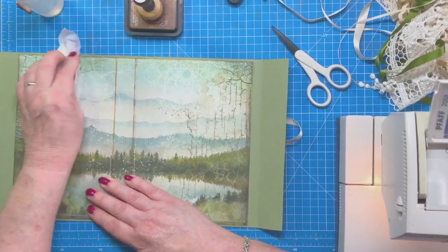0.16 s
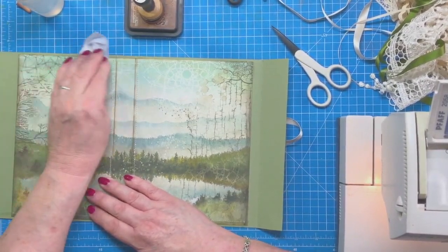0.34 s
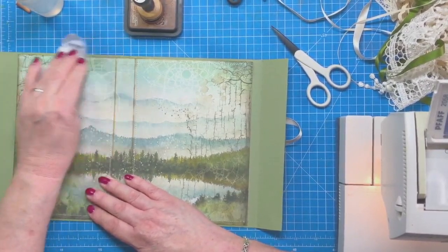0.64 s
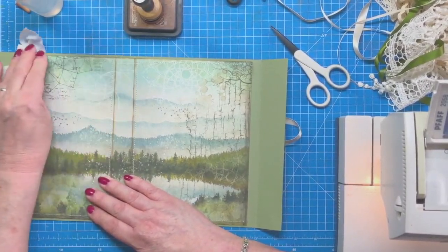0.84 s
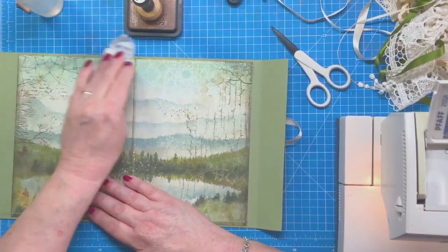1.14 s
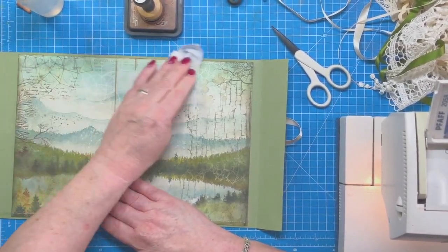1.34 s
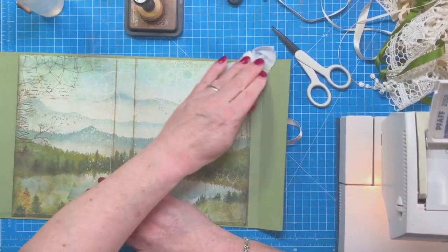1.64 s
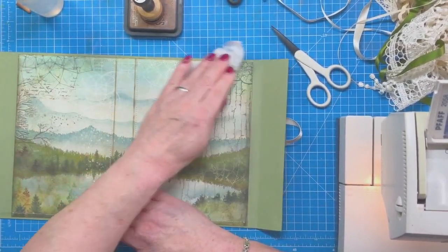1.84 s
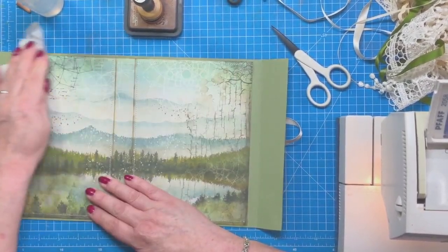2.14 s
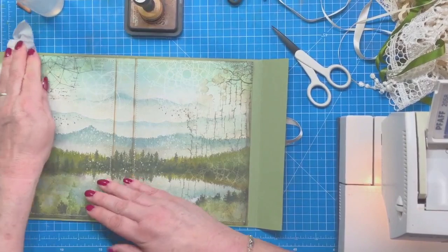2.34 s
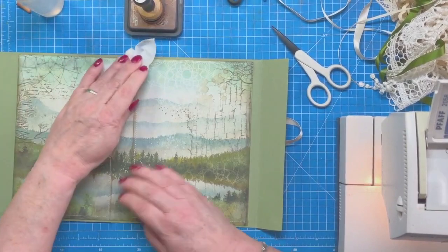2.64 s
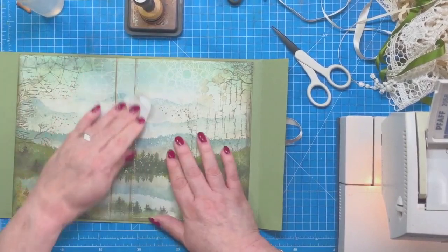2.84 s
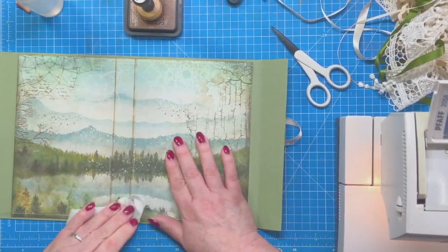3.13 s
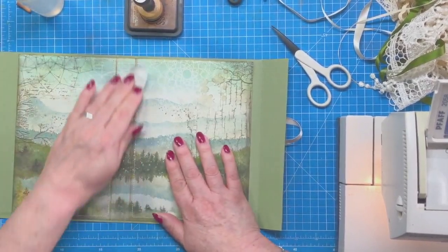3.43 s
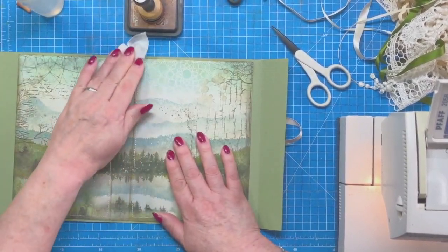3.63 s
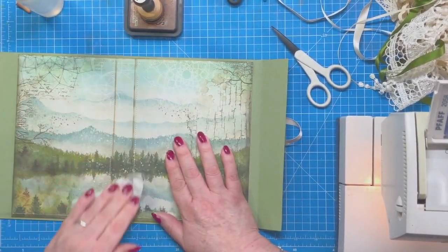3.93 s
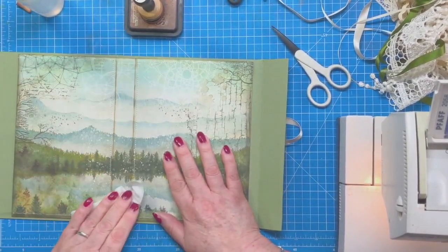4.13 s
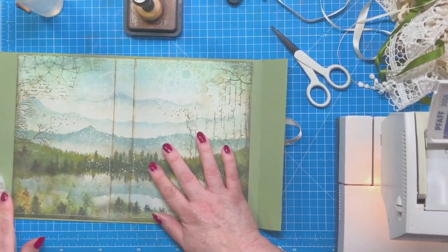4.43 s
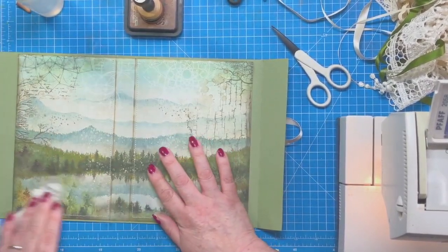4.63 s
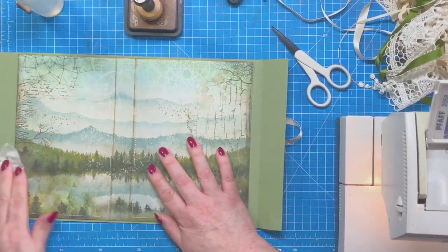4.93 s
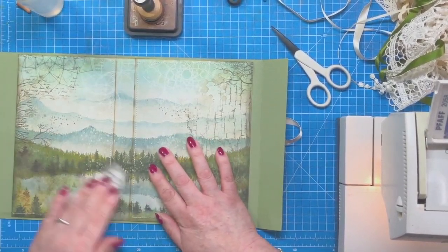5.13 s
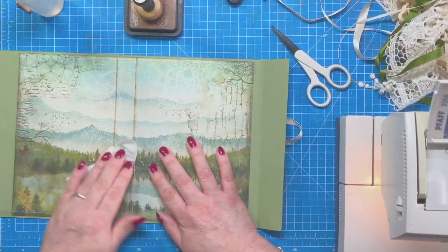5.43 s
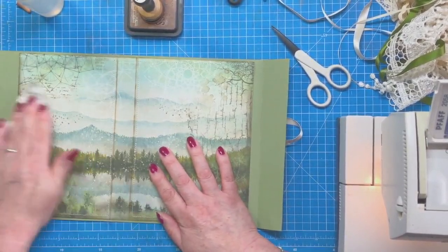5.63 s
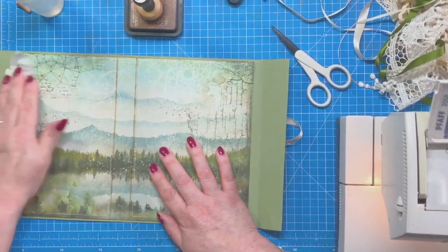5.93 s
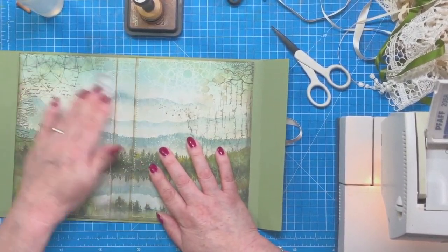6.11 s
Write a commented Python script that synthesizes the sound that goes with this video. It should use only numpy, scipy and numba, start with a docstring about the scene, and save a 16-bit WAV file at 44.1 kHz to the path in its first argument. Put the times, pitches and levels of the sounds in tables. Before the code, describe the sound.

Dry, breathy paper rubbing, long swishes turning to quick short scrubs, crisp little snaps, and a sudden hard rattle past the middle, indoors and close.

```python
"""On a craft table in a small quiet room, a wadded tissue is scrubbed to and fro over paper glued to a card cover.
The wad hisses through thousands of tiny random slips, shaped by moving resonances; coarser slips make the card
rasp and the table rumble. Paper edges snap as filtered pulses, the cover taps the mat with a pat and a short ring,
and once the hand knocks something that clatters, its many tones ringing at each blow.
A faint hum and room noise lie behind it all, and the room adds a quiet tail."""
import sys
import numpy as np
from scipy import signal
from scipy.fft import rfft, irfft, next_fast_len
from scipy.io import wavfile
from scipy.ndimage import uniform_filter1d
from numba import njit

SR = 44100
rng = np.random.default_rng(int(sys.argv[2]) if len(sys.argv) > 2 else 0)


def store_pcm(level_fs):
    """Save levels as 16-bit WAV."""
    pcm = np.round(np.clip(level_fs, -1, 1) * 32767).astype(np.int16)
    wavfile.write(sys.argv[1], SR, np.atleast_2d(pcm).T)


N = 276507
T = np.arange(N) / SR  # time of every sample, s
TOP_HZ = 15900  # upper limit of the sound


def undb(db):
    """Turn decibels into a gain."""
    return 10 ** (np.asarray(db) / 20)


def unit(x):
    """Scale a sound to an average (rms) level of 1."""
    return x / np.sqrt(np.mean(x ** 2))


def colour(x, points):
    """Give a sound the spectrum drawn by (pitch_hz, level_db) points, without smearing it back in time."""
    hz, db = np.transpose(points)
    size = 2 * next_fast_len(len(x))
    f = np.maximum(np.fft.rfftfreq(size, 1 / SR), 1)
    skirts = np.minimum(f / hz[0], 1) ** 2 * np.minimum(hz[-1] / f, 1) ** 2  # fall off outside the points
    gain = undb(np.interp(np.log(f), np.log(hz), db)) * skirts
    # folding the cepstrum makes the filter minimum-phase: it answers only after its input
    cepstrum = irfft(np.log(gain))
    cepstrum[1:size // 2] *= 2
    cepstrum[size // 2 + 1:] = 0
    response = np.exp(rfft(cepstrum))
    return irfft(rfft(x, size) * response)[:len(x)]


def walk(rate):
    """Wander smoothly at random with spread 1, changing about rate times a second."""
    k = max(int(SR / rate), 1)
    steps = np.repeat(rng.standard_normal(N // k + 1), k)
    return unit(uniform_filter1d(steps, k)[:N])


def fade(t, t60):
    """Die away exponentially, 60 dB down after t60 seconds."""
    return np.exp(-np.log(1000) * t / t60)


def soften(x, hz):
    """Dull the treble above hz, as a softer, longer contact does."""
    return signal.sosfilt(signal.butter(2, hz, fs=SR, output="sos"), x)


def thin(x, hz):
    """Cut the bass below hz, because a small body radiates little of it."""
    return signal.sosfilt(signal.butter(4, hz, "highpass", fs=SR, output="sos"), x)


def add(out, s, x):
    """Mix x into out from time s."""
    i = int(s * SR)
    out[i:i + len(x)] += x[:N - i]


def blow(x, db):
    """Give a blow as much energy as a steady level of db held for 5 ms."""
    return x * undb(db) * np.sqrt(.005 * SR / np.sum(x ** 2))


def slips(rate, spread_db):
    """Make tiny stick-slip clicks at random moments, rate a second, with sizes that vary by spread_db."""
    happens = rng.random(N) < rate / SR
    size = undb(spread_db * np.clip(rng.standard_normal(N), -2.5, 2.5))
    clicks = happens * rng.choice([-1, 1], N) * size
    return unit(clicks / np.sqrt(rate))  # a higher rate is denser, not louder


@njit
def resonate(x, hz, width):
    """Band-pass whose centre and width (Hz) move from sample to sample; gain 1 at the centre."""
    y, band, low = np.empty(len(x)), 0., 0.
    for i in range(len(x)):
        g, k = np.tan(np.pi * hz[i] / SR), width[i] / hz[i]
        v = (band + g * (x[i] - low)) / (1 + g * (g + k))
        band, low, y[i] = 2 * v - band, low + 2 * g * v, k * v
    return y


def formant(x, hz, q):
    """Ring a sound through one moving resonance twice, for steep sides, at rms 1."""
    once = resonate(x, hz, hz / q)
    return unit(resonate(once, hz, hz / q))


# spectrum of the room noise: pitch_hz, level_db (relative)
ROOM_SPECTRUM = [(18, -44), (30, -26.5), (230, -2.5), (505, -7.5), (639, -3), (767, -9), (1400, -5),
                 (1870, -11.5), (2240, -10), (4310, -12.5), (5170, -10.5), (7460, -12), (15500, -16.5)]
ROOM_DB = -60
HUM_HZ, HUM_DB = 122, -78


def quiet_room():
    """Still room noise is shaped random noise, with a faint steady hum."""
    air = unit(colour(rng.standard_normal(N), ROOM_SPECTRUM))
    hum = unit(np.sin(2 * np.pi * HUM_HZ * T))
    return undb(ROOM_DB) * air + undb(HUM_DB) * hum


def walls(x, wet_db, low_t60, high_t60):
    """A small furnished room returns a faint, diffuse tail whose lows stay longest."""
    t = T[:SR // 2]
    low, high = rng.standard_normal((2, len(t)))
    tail = 1.44 * soften(low, 620) * fade(t, low_t60) + soften(high, 8000) * fade(t, high_t60)
    tail *= t > .006  # the first reflections take 6 ms to arrive
    tail /= np.sqrt(np.sum(tail ** 2))
    return undb(wet_db) * signal.fftconvolve(x, tail)[:N]


# blows of the knock and its clatter: start_s, level_db (before the bass cut), treble_limit_hz of the contact
KNOCK_BLOWS = [(4.3564, -27, 6000), (4.3638, -20.5, 5530), (4.3705, -22, 2820), (4.3745, -25, 3000),
               (4.3785, -29, 1400), (4.4334, -32.5, 2800), (4.4381, -26.5, 980), (4.448, -37, 2380),
               (4.4525, -28, 1500), (4.459, -31, 1000), (4.465, -28, 1080), (4.494, -33, 2000),
               (4.499, -37, 600), (4.522, -38, 1110)]
# tones of the knocked thing: pitch_hz, level_db (relative, average), die_away_s (to 60 dB down)
KNOCK_TONES = [(197, -13, .25), (238.6, -11.5, 0.17), (290, -15, 0.15), (497, -1.5, 0.098), (666, 0, 0.055),
               (743, -0.5, 0.069), (960, -2.5, 0.095), (1046, -2, 0.11), (1134, -9, 0.19),
               (1127, -4, 0.068), (1227, -5, 0.13), (1325, -3, 0.094), (1500, -2.5, 0.049),
               (1700, -12, 0.054), (1810, -13, 0.046), (1880, -6, 0.049), (1986, -17, 0.054),
               (2056, -1, 0.061), (2210, 1, 0.056), (2500, -3.5, 0.056), (2650, -4, 0.037), (3563, 5, .035),
               (3610, -2, 0.028)]
# spectrum of its crack and dense tail: pitch_hz, level_db (relative)
KNOCK_SPECTRUM = [(90, -34), (145, -14), (190, -6.5), (270, 0), (380, -18), (500, 0), (600, -9), (730, 0),
                  (1300, -8), (2000, 1), (3000, -7.5), (3550, -1), (4300, -8), (12000, -17.5)]


def knock():
    """Every blow of the clatter cracks, rings the same tones in new shares and leaves a dense tail."""
    out, t = np.zeros(N), T[:SR // 2]
    hz, tone_db, t60 = np.transpose(KNOCK_TONES)[:, :, None]
    for s, db, contact_hz in KNOCK_BLOWS:
        shares = undb(tone_db + 1.7 * rng.standard_normal(hz.shape)) * rng.choice([-1, 1], hz.shape)
        pitch = hz * (1 + 0.0074 * rng.standard_normal(hz.shape))  # it sits a little differently at each blow
        ring = np.sum(shares * np.cos(2 * np.pi * pitch * t) * fade(t, t60), axis=0)
        crack = colour(1. * (t == 0), KNOCK_SPECTRUM)
        tail = colour(rng.standard_normal(len(t)) * fade(t, .09), KNOCK_SPECTRUM)
        hit = unit(ring) + undb(-1) * unit(crack) + undb(-4) * unit(tail)
        add(out, s, blow(soften(hit, contact_hz), db))
    return thin(out, 115)


# cover and fingers tapping the mat: start_s, level_db (before the bass cut), treble_limit_hz of the pat, ring_hz
MAT_TAPS = [(.3675, -41.5, 2300, 603), (0.668, -44, 2000, 1000), (.797, -43.5, 500, 549),
            (.99, -45, 350, 240), (2.293, -48, 2200, 1210), (2.5892, -34.5, 4000, 1470),
            (2.596, -39.5, 2200, 655), (2.603, -42, 1200, 392), (3.65, -51, 700, 636),
            (4.577, -41.5, 400, 290), (4.615, -47.5, 350, 270), (6.218, -47, 1310, 1130)]
# spectrum of the pat: pitch_hz, level_db (relative)
PAT_SPECTRUM = [(120, -32.5), (250, 2), (380, 2.5), (560, 0), (850, 5), (1400, 0.5), (2500, 1), (6000, -14)]


def taps():
    """The cover or a finger lands on the mat with a short pat and a brief ring, each spot at its own pitch."""
    out, t = np.zeros(N), T[:SR // 5]
    for s, db, contact_hz, ring_hz in MAT_TAPS:
        strike = (t == 0) + 0.12 * rng.standard_normal(len(t)) * fade(t, 0.092)
        pat = soften(colour(strike, PAT_SPECTRUM), contact_hz)
        ring = np.sin(2 * np.pi * ring_hz * t) * fade(t, 50 / ring_hz)  # low rings last longer
        add(out, s, blow(unit(pat) + undb(-1.5) * unit(ring), db))
    return thin(out, 150)


# paper edges and creases snapping under the wad: start_s, level_db, pitch_hz
PAPER_SNAPS = [(.7622, -45, 6500), (.778, -48, 11000), (0.8445, -37.5, 4860), (0.932, -42, 13000),
               (2.202, -41.5, 2100), (2.401, -40, 7500), (4.0815, -48, 4470), (4.785, -41.5, 4500),
               (4.926, -43, 2300), (4.9522, -38.5, 3470), (5.2565, -41, 6500), (5.2788, -35.5, 4050),
               (5.3055, -36.5, 4000), (5.484, -33.5, 4380), (5.493, -39, 3800), (5.6016, -35.5, 6000),
               (5.811, -38, 3200), (5.9438, -33.5, 5900), (5.954, -37.5, 3980), (6.1474, -40, 3460)]


def snaps():
    """A paper edge flicks free: a sharp pulse in a broad resonance, then a few ms of flutter."""
    out, t = np.zeros(N), T[:SR // 20]
    for s, db, hz in PAPER_SNAPS:
        flick = (t == 0) + 0.2 * rng.standard_normal(len(t)) * fade(t, 0.018)
        band = signal.butter(2, [hz / 2.1, min(hz * 1.9, TOP_HZ)], "bandpass", fs=SR, output="sos")
        add(out, s, blow(signal.sosfilt(band, flick), db))
    return out


# short thumps and scuffs of the wad, over a fold or as a sweep starts:
# peak_s, half_length_s, rumble_db, scuff_db (both before mixing)
THUMPS_AND_SCUFFS = [(.005, .03, -53, -60), (1.248, 0.018, -61, -50), (1.935, .04, -53, -53),
                     (2.067, 0.03, -57, -70), (2.3, .022, -71, -48), (3.261, 0.015, -56, -62),
                     (3.38, 0.057, -58, -65), (3.784, 0.02, -59, -62), (4.815, .018, -75, -49.5),
                     (4.898, 0.011, -66, -47), (5.227, .01, -61, -49), (5.47, .016, -58, -53),
                     (5.555, 0.0069, -59, -45.5), (5.726, 0.012, -55, -46), (5.812, 0.017, -64, -43.5),
                     (6.141, 0.019, -63, -48.5), (6.217, 0.01, -52, -45)]


def thumps_and_scuffs():
    """Each thump or scuff gives a short bell-shaped swell; returns the gains of its rumble and its scuff."""
    gains = np.zeros((2, N))
    for s, half_s, rumble_db, scuff_db in THUMPS_AND_SCUFFS:
        swell = np.exp(-.5 * ((T - s) / half_s) ** 2)
        gains += undb([[rumble_db], [scuff_db]]) * swell
    return gains


# sweeps of the wad: start_s, end_s, speeding_up_s, slowing_down_s, level_db (before mixing), swell_db (start to end),
# fine_hiss_db and rasp_db (relative to level_db), rumble_db (before mixing), fold_pitch_hz (the fold that bears)
SWEEPS = [(-0.056, 0.15, 0.05, 0.095, -47.5, -2, -0.5, -4.5, -67, 2700.0),
          (0.161, 0.402, 0.058, 0.107, -46.0, -1.5, -2, -6.5, -65.5, 6450),
          (0.35, 0.455, 0.029, 0.015, -54.5, -7, -1, -11, -75, 2500.0),
          (0.391, 0.707, 0.12, 0.08, -44.0, -0.5, -1.5, -7, -62.0, 2980),
          (0.711, 0.809, 0.051, 0.04, -50, -2.5, -5, -5.0, -65, 2500.0),
          (0.772, 0.91, 0.028, 0.051, -59, 4, 1.5, 2.5, -60, 4230),
          (0.863, 1.21, 0.066, 0.073, -45.5, -1.5, -3, -5, -63.5, 2440),
          (1.113, 1.626, 0.12, 0.087, -45, -4, -6, -7, -64.5, 2500.0),
          (1.618, 2.145, 0.14, 0.063, -43.5, -1.5, -2.5, -8.5, -67, 6700.0),
          (2.215, 2.54, 0.156, 0.11, -42.0, -15, -2.0, -9.0, -65, 4100.0),
          (2.476, 2.61, 0.039, 0.023, -49, 4, -4, -6.5, -64.5, 4000.0),
          (2.567, 3.038, 0.043, 0.1, -44.0, -3, -2, -6.5, -63.5, 6200),
          (3.074, 3.542, 0.064, 0.16, -45.0, 1.5, -2.0, -8.5, -63.5, 7440),
          (3.568, 3.964, 0.068, 0.085, -46.0, -3.5, -2, -8, -64, 4630),
          (3.979, 4.081, 0.032, 0.038, -54.0, -1.5, -9, -7.0, -68, 5200.0),
          (4.069, 4.369, 0.076, 0.061, -43.5, 8, -4.5, -11, -67.5, 3570),
          (4.345, 4.52, 0.02, 0.034, -53, -14, -13, 0, -60, 4200),
          (4.44, 4.7, 0.12, 0.052, -42.5, -9, -6, -6.5, -60, 5300.0),
          (4.683, 4.876, 0.041, 0.068, -43, 1, -4.5, -10, -63.0, 3680),
          (4.851, 5.044, 0.057, 0.053, -43.5, -1.5, -3.5, -9.5, -70, 4900.0),
          (5.031, 5.246, 0.032, 0.15, -41.5, 9, -0.5, -8, -66, 5000.0),
          (5.19, 5.382, 0.036, 0.081, -42.5, 4, -2.5, -5.5, -62, 2500.0),
          (5.361, 5.549, 0.039, 0.058, -42.5, 0.5, -1.5, -7, -64.5, 3700.0),
          (5.532, 5.702, 0.03, 0.053, -42.5, 3.5, -2.5, -9.0, -62.5, 6000.0),
          (5.666, 5.867, 0.066, 0.056, -44, -3, -0.5, -9.5, -60, 3500.0),
          (5.843, 6.033, 0.035, 0.059, -44.5, -1, -2.5, -7.5, -61.5, 3600.0),
          (6.024, 6.2, 0.031, 0.072, -42.5, 1, -2.5, -14, -60.5, 3430),
          (6.177, 6.315, 0.05, 0.043, -44.5, -5, -3, -12.5, -63.0, 2500.0)]
ARCH = .15  # share by which the hand is slower at the ends of a sweep than in its middle, besides starting and stopping
FINE_POWER, RASP_POWER, RUMBLE_POWER = 1.62, 0.65, 0.44  # each layer grows as speed to this power
SHOVE_DB, SHOVE_RASP_DB, SHOVE_S = 5.5, 2.5, .045  # the first shove adds rumble and rasp, then dies away
STICK_DB, BREAKAWAY = 3, 0.39  # the wad clings, this much quieter, up to this share of its speeding-up
SHAKE_DB, SHAKE_S = -70.5, 0.19  # table shake at full speed; sweeps longer than SHAKE_S shake it less


def sweeps():
    """The hand speeds up, glides and slows; returns speed, gains of five layers, and the bearing fold's pitch."""
    power, fold = np.zeros((6, N)), np.full(N, float(SWEEPS[0][-1]))
    for start, end, rise_s, fall_s, db, swell_db, fine_db, rasp_db, rumble_db, fold_hz in SWEEPS:
        on = (T > start) & (T < end)
        t, length = T[on] - start, end - start
        along = t / length - .5  # -0.5 at the start, 0.5 at the end
        rise = np.sin(np.pi / 2 * np.minimum(t / rise_s, 1))
        fall = np.sin(np.pi / 2 * np.minimum((length - t) / fall_s, 1))
        speed = (rise * fall) ** 2 * (1 - ARCH * (2 * along) ** 2)
        stuck = .5 - .5 * np.tanh((t - BREAKAWAY * rise_s) / .003)  # 1 while clinging, then 0
        shove = np.exp(-t / SHOVE_S)
        press = undb(db + swell_db * along - STICK_DB * stuck)
        fine = press * undb(fine_db) * speed ** FINE_POWER
        rasp = press * undb(rasp_db + SHOVE_RASP_DB * shove) * speed ** RASP_POWER
        rumble = undb(rumble_db + SHOVE_DB * shove) * speed ** RUMBLE_POWER
        shake = undb(SHAKE_DB) * speed * min(SHAKE_S / length, 1) ** 2
        # overlapping sweeps add as powers
        power[:, on] += np.array([speed, press * speed, fine, rasp, rumble, shake]) ** 2
        fold[T > start] = fold_hz
    return *np.sqrt(power), uniform_filter1d(fold, size=SR // 25)  # the fold's pitch glides over 40 ms


# spectrum of the rumble: pitch_hz, level_db (relative)
RUMBLE_SPECTRUM = [(50, -29), (90, -12.5), (140, -4), (200, 4.5), (290, -5), (390, 3.5), (480, -8.5),
                   (620, -2), (760, -11), (1100, -13)]
COVER_HZ, COVER_WANDER = 301, 0.17  # pitch of the loaded cover, and the share by which it wanders
SHAKE_HZ = 140  # pitch of the shaking table


def table(weight, shake):
    """The dragging hand judders the cover at a wandering pitch; short, brisk sweeps shake the table."""
    top = unit(colour(slips(900, spread_db=4.5), RUMBLE_SPECTRUM))
    cover = formant(slips(700, spread_db=4), COVER_HZ * np.exp(COVER_WANDER * walk(6)), q=2.2)
    board = formant(slips(90, spread_db=5), np.full(N, float(SHAKE_HZ)), q=1.24)
    judder = (undb(-5) * top + undb(-3) * cover) * undb(-0.3 + 2.1 * walk(30))
    return weight * judder + shake * board


# spectra of the fibre hiss, the fine hiss and the card rasp: pitch_hz, level_db (relative)
HISS_SPECTRUM = [(900, -26), (1600, -10), (2500, -4.5), (3500, 0), (5000, 1.5), (5700, 0.5), (6300, 0),
                 (7000, -2.5), (7800, -8.5), (10000, -8), (15000, -32)]
FINE_SPECTRUM = [(4000, -16), (6500, -2.5), (8500, 0), (10500, -2.5), (12500, -5.5), (14500, -12),
                 (16000, -18)]
RASP_SPECTRUM = [(350, -12), (600, -13), (750, -8.5), (950, -5.5), (1200, -2), (1850, -1.5), (2400, -2),
                 (3500, -6), (6000, -22.5)]
# hollow under the arched hand, ringing when it lies flat and near: time_s, pitch_hz, level_db
# (average pitch and level of its lower resonance, relative to the dense fibre hiss)
HAND_HOLLOW = [(0, 1600, -24), (1.0, 1880, -26), (1.27, 2220, -12.5), (1.6, 2530, -29), (2.3, 1290, -16),
               (2.5, 1650, -26), (3.0, 1790, -14), (3.11, 1880, -2), (3.2, 1850, -9.5), (4.7, 1700, -15.5),
               (4.83, 1660, -3.5), (5.04, 1600, -18), (5.19, 1620, -1), (5.28, 1660, -20), (5.56, 1520, -9),
               (5.66, 1550, -38), (5.81, 1590, -13), (6.26, 1600, -29)]
FOLD_DB, FOLD_Q = -10, 3.6  # the bearing fold: level relative to the dense hiss, sharpness
CRACKLE_PER_S, CRACKLE_DB = 110, -11  # single fibres tearing loose; level relative to the dense hiss


def fibre_hiss(speed, bearing_hz):
    """Fibres catch and slip more often at speed, while folds of the wad colour the hiss and single fibres tear."""
    hiss = unit(colour(slips(3000 + 19000 * speed, spread_db=4), HISS_SPECTRUM))
    # folds of the wad shift as it rolls, so patches of the hiss swell and slide
    for fold_hz in (2700, 3700, 6200):
        patch = formant(slips(9000, spread_db=3.5), fold_hz * np.exp(0.11 * walk(9)), q=3.8)
        hiss += patch * undb(-16 + 2.7 * walk(22))
    bearing_hz = bearing_hz * np.exp(0.072 * walk(12))
    hiss += undb(FOLD_DB) * formant(slips(9000, spread_db=2.5), bearing_hz, q=FOLD_Q)
    crackle = unit(colour(slips(CRACKLE_PER_S, spread_db=1), HISS_SPECTRUM))
    return hiss + undb(CRACKLE_DB) * crackle


def hand_hollow():
    """Coarse slips ring the air under the hand at two linked pitches, which shift as the fingers slide."""
    catches = slips(2000, spread_db=5.5)
    time_s, pitch_hz, level_db = np.transpose(HAND_HOLLOW)
    hz = np.interp(T, time_s, pitch_hz) * np.exp(0.041 * walk(25))
    ring = formant(catches, hz, q=5.0) + undb(-4.5) * formant(catches, 2.2 * hz, q=4.9)
    return ring * undb(np.interp(T, time_s, level_db) + 2 * walk(60))


def tissue(speed, hiss_gain, fine_gain, rasp_gain, bearing_hz):
    """A faster stroke frees more fibres and hisses more finely; a slow, heavy one makes the card rasp."""
    grip = undb(0.65 * walk(90) + 0.18 * walk(15))  # the wad grips and lets go unevenly
    hiss = undb(-1) * (fibre_hiss(speed, bearing_hz) + hand_hollow())
    fine = unit(colour(slips(4000 + 16000 * speed, spread_db=2.5), FINE_SPECTRUM))
    fine *= undb(0.5 + 1.2 * walk(16))
    # faster drag catches the paper's grain more often
    rasp = unit(colour(slips(900 + 1800 * speed, spread_db=2.5), RASP_SPECTRUM))
    rasp *= undb(-1.02 + 2 * walk(50))
    return grip * (hiss_gain * hiss + fine_gain * fine + rasp_gain * rasp)


SCUFF_HISS_DB = 2.5  # hiss gain of a scuff, relative to its rasp gain


def scene():
    """Mix everything on the table with the room, alike in both channels."""
    speed, hiss, fine, rasp, rumble, shake, fold_hz = sweeps()
    thump, scuff = thumps_and_scuffs()
    hiss = np.hypot(hiss, undb(SCUFF_HISS_DB) * scuff)
    rubbing = tissue(speed, hiss, fine, np.hypot(rasp, scuff), fold_hz)
    rumbling = table(np.hypot(rumble, thump), shake)
    near = knock() + taps() + snaps() + rumbling + rubbing
    mono = quiet_room() + walls(near, wet_db=-18.5, low_t60=0.3, high_t60=0.23) + near
    return np.array([mono, mono])


def record(dry):
    """The recorder steeply cuts the treble above TOP_HZ."""
    return signal.sosfilt(signal.ellip(10, .2, 70, TOP_HZ, fs=SR, output="sos"), dry)


dry = scene()
out = record(dry)
store_pcm(out)
```